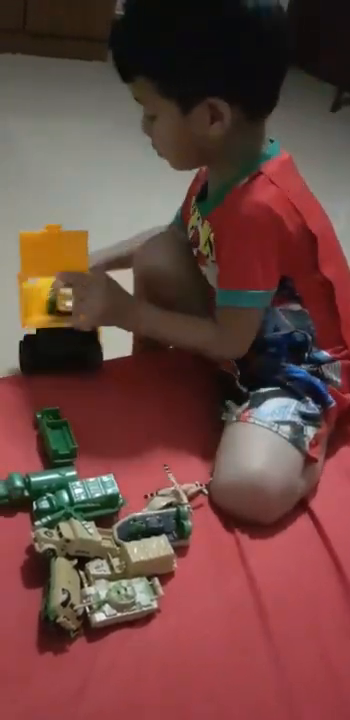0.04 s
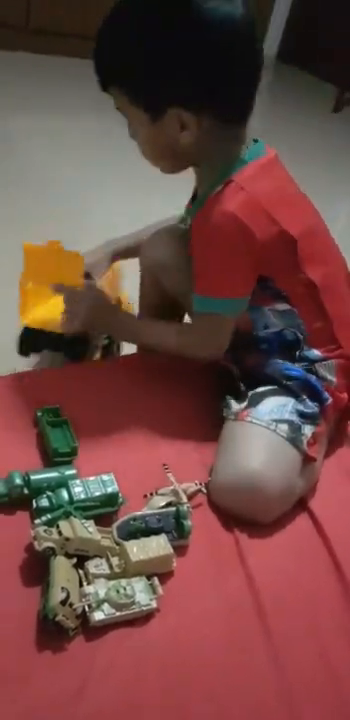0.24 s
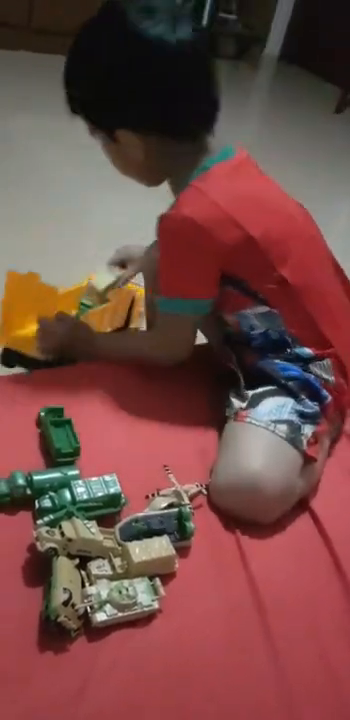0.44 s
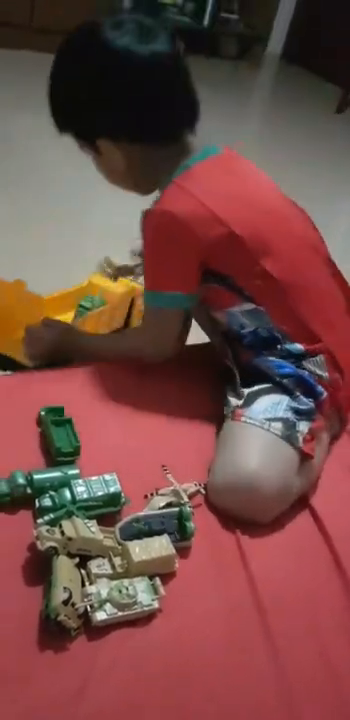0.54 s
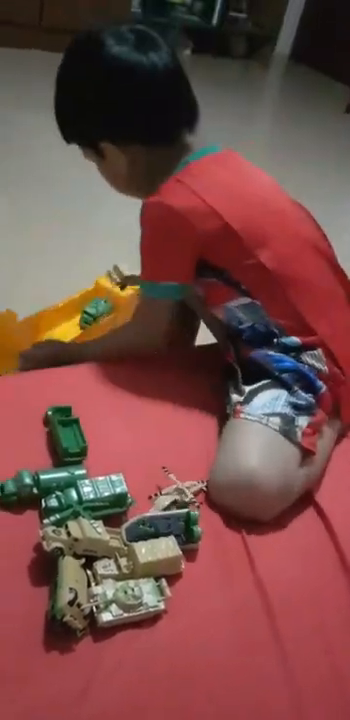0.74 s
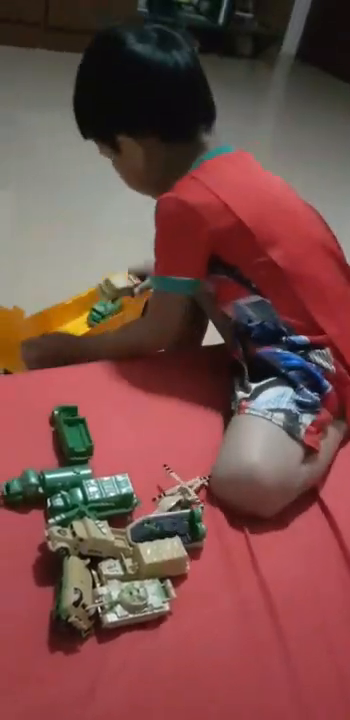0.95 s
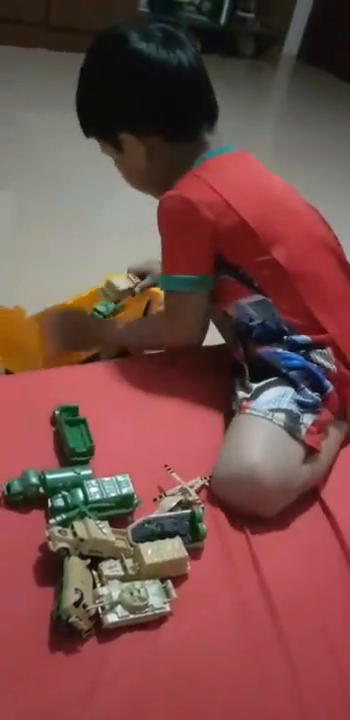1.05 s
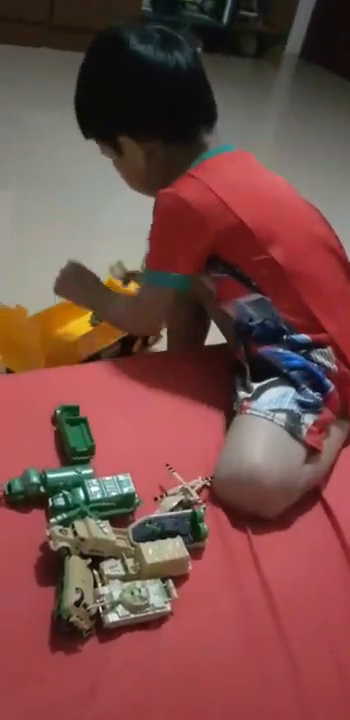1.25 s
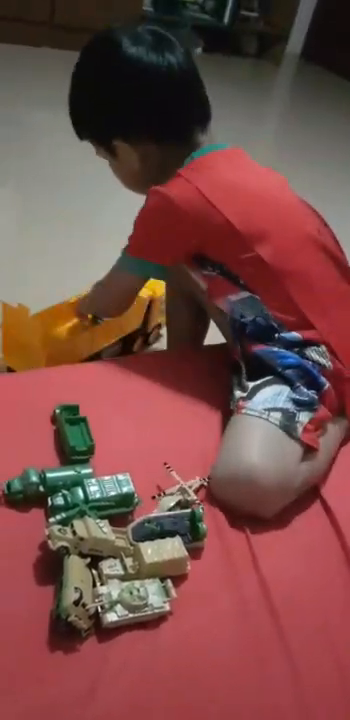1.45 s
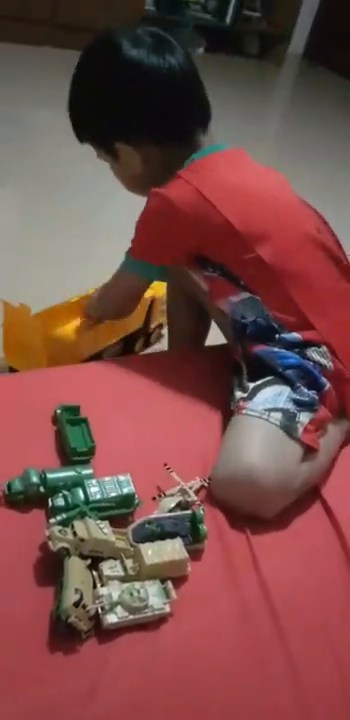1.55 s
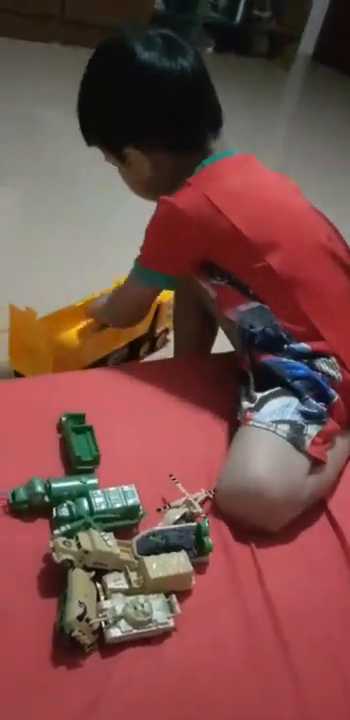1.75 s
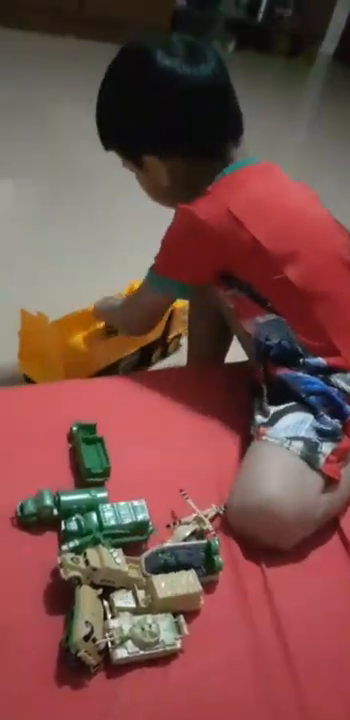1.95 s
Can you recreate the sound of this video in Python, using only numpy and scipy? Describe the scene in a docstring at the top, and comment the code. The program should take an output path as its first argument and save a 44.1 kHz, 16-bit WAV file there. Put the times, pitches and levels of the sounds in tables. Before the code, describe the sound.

A hollow plastic toy truck knocks and rattles from the start, with the loudest knock at about 0.5 seconds. Its wheels patter briefly over a hard floor, ending with lighter knocks near 0.8 seconds. After a lull, small plastic toys click together from 1.5 to 1.8 seconds. The bare room rings slightly, with a few soft low bumps on the microphone and faint rumble and hiss throughout.

```python
"""A hollow plastic toy truck is tipped over, set down and rolled a short way on a hard floor.
Its body knocks and rattles, its wheels patter; then small plastic toys click together in its bed.
Each contact spreads through the plastic as a bending wave and rings its modes in a bare, live room.
Soft low bumps reach the microphone ports, over a faint room rumble and hiss."""
import sys
import numpy as np
from scipy import signal
from scipy.fft import rfft, irfft, next_fast_len
from scipy.io import wavfile

SR = 44100
rng = np.random.default_rng(int(sys.argv[2]) if len(sys.argv) > 2 else 0)


def generate_wav(sig):
    """Save sig (samples, or channels by samples) to the path in sys.argv[1] as 16-bit PCM at SR."""
    pcm = np.round(np.clip(np.atleast_2d(sig).T, -1, 1) * 32767).astype(np.int16)
    wavfile.write(sys.argv[1], SR, pcm)


N = 88200
ROOM_BUILD_S = 0.0052


def amp(db):
    """Decibels to gain."""
    return 10 ** (np.asarray(db) / 20)


def unit(x):
    """Scale to rms 1."""
    return x / np.sqrt(np.mean(x ** 2) + 1e-20)


def decay(t, t60):
    """An envelope that falls 60 dB in t60 seconds."""
    return np.exp(-np.log(1000) * t / t60)


def along(points, hz):
    """Read a curve of (f/Hz, value) points on a log frequency axis."""
    f, v = np.transpose(points)
    return np.interp(np.log(hz + 1), np.log(f + 1), v)


def filtered(x, response):
    """Filter x by a function of frequency."""
    n = x.shape[-1]
    m = next_fast_len(n + SR // 4)
    return irfft(rfft(x, m) * response(np.fft.rfftfreq(m, 1 / SR)), m)[..., :n]


def equalised(x, curve):
    """Shape x with an EQ curve of (f/Hz, gain/dB) points."""
    return filtered(x, lambda hz: amp(along(curve, hz)))


def panned(x, balance):
    """Tilt each frequency between the left and right port."""
    return filtered(x, lambda hz: amp(along(balance, hz) * np.array([[.5], [-.5]])))


def minimum_phase(gain):
    """The impulse response with the sharpest attack for this spectrum."""
    cepstrum = irfft(np.log(np.maximum(gain, 1e-6)))
    half = len(cepstrum) // 2
    cepstrum[1:half] *= 2
    cepstrum[half + 1:] = 0
    return irfft(np.exp(rfft(cepstrum)))[:half]


def add(out, start_s, x):
    """Mix x into out at start_s."""
    i = max(round(start_s * SR), 0)
    out[:, i:i + x.shape[1]] += x[:, :N - i]


def diffuse(n):
    """Stereo noise as a room delivers it: alike in the bass, unrelated in the treble."""
    # likeness of left and right: f/Hz, correlation
    likeness = [(100, 0.7), (300, 0.7), (550, 0.62), (1000, 0.024), (3000, -0.0079)]

    def mid_side_gains(hz):
        angle = np.arccos(np.clip(along(likeness, hz), -1, 1)) / 2
        return np.array([np.cos(angle), np.sin(angle)])

    mid, side = filtered(rng.standard_normal((2, n)), mid_side_gains)
    return np.array([mid + side, mid - side])


def room_tone():
    """A faint, steady bed of rumble and hiss."""
    # colour of the bed: f/Hz, gain/dB
    colour = [(24, -31), (45, -3), (70, -6), (90, 3), (120, -15.5), (170, -7.5), (280, -7), (450, -12),
              (650, -16.5), (900, -13), (1200, -24), (2500, -33.5), (4800, -37.5), (5250, -31.5),
              (5700, -37.5), (8300, -50), (12200, -33.5), (16000, -34.5)]
    # its stereo tilt: f/Hz, left minus right/dB
    balance = [(60, -1.5), (180, -8), (550, -3.5), (1650, -3.5), (4970, 3), (15000, -2)]
    return panned(amp(-62.5) * unit(equalised(diffuse(N), colour)), balance)


def room_tail():
    """A fresh reverb tail of energy 1 a side: reflections build quickly, the treble dies first."""
    # reverb time of the bare room: f/Hz, t60/s
    reverb_times = [(150, 0.6), (500, 0.46), (1400, 0.45), (3700, 0.4), (7000, 0.43), (11000, 0.32),
                    (16000, 0.29)]
    predelay_s = 0.00067
    hz, t, bands = signal.stft(diffuse(SR * 3 // 4), SR, nperseg=256)
    tail = signal.istft(bands * decay(t, along(reverb_times, hz)[:, None]), SR, nperseg=256)[1]
    age = np.maximum(np.arange(tail.shape[1]) / SR - predelay_s, 0)
    tail *= 1 - np.exp(-age / ROOM_BUILD_S)
    return tail / np.sqrt(np.sum(tail ** 2) / 2)


def port_bumps():
    """Soft thuds of a few slow cycles, each mostly in one microphone port."""
    # low thuds: t/s, level/dB, f/Hz, left minus right/dB
    bumps = [(0.194, -44, 75, -9), (0.534, -37, 52, 21), (0.656, -57, 59, 18), (0.813, -40.5, 60, 36),
             (0.854, -38.5, 51, 31), (1.826, -42, 50, 17)]
    length_s = 0.053
    out = np.zeros((2, N))
    t = np.arange(SR // 4) / SR
    swell = np.sin(np.pi * np.minimum(t / length_s, 1)) ** 2
    for start_s, db, hz, pan_db in bumps:
        pan = amp([[min(pan_db, 0)], [min(-pan_db, 0)]])
        add(out, start_s, amp(db) * swell * np.sin(2 * np.pi * hz * t) * pan)
    return out


def wheels():
    """Hard wheels patter over the floor while the truck is pushed, with a low rumble on the left."""
    # colour of the patter: f/Hz, gain/dB
    colour = [(60, -14), (150, 2.5), (300, -2), (500, 4.5), (1000, 8), (1550, 6.5), (2200, -8), (3000, -24),
              (6000, -45), (9000, -48)]
    start_s, attack_s, stop_s, release_s = 0.524, 0.15, 0.88, 0.052
    ticks_per_s, rumble_hz, half_width_hz = 350, 72.5, 21
    t = np.arange(N) / SR
    push = np.clip((t - start_s) / attack_s, 0, 1) * np.clip((stop_s - t) / release_s + 1, 0, 1)
    ticks = (rng.random(N) < ticks_per_s / SR) * rng.standard_normal(N)
    patter = push * unit(equalised(ticks, colour))
    reverb = signal.fftconvolve(room_tail(), patter[None], axes=1)[:, :N]
    low_band = lambda hz: 1 / (1 + ((hz - rumble_hz) / half_width_hz) ** 2)
    rumble = push * unit(filtered(rng.standard_normal(N), low_band))
    return amp(-52) * (.4 * patter + 1.41 * reverb) + amp(-46) * rumble * np.array([[1], [0]])


def bending(hz):
    """Phase of a bending wave in the plastic: its speed grows with the root of its frequency."""
    delay_at_1khz_s = 0.001177
    return np.exp(-4j * np.pi * delay_at_1khz_s * np.sqrt(1000 * hz))


def ring_out(modes, shell):
    """A body's modes linger as fading tones, struck a little differently each time."""
    scatter_db, stereo_spread_rad = 3.5, 0.98
    t = np.arange(SR // 2) / SR
    tones = np.zeros((2, len(t)))
    for hz, _, db in modes:
        gain = amp(db + along(shell, hz) + rng.normal(0, scatter_db))
        phase = 2 * np.pi * (hz * t + rng.random())
        tones += gain * np.sin(phase + stereo_spread_rad * rng.standard_normal((2, 1)))
    envelope = decay(t, t60=0.36) * (1 - np.exp(-t / ROOM_BUILD_S))
    return unit(tones * envelope) / np.sqrt(len(t))


def plastic_hits(hits, shell, modes, chatter_t60_s, chatter_db, ring_db):
    """Each contact and its buzz of loose parts ring a plastic body, heard direct and through the room."""
    # hands and the truck's walls shade the direct path: f/Hz, gain/dB
    shade = [(500, -4), (1100, 3.5), (2200, 0), (4000, -2), (11000, -0.5)]
    hz = np.fft.rfftfreq(SR // 2, 1 / SR)
    resonances = sum(amp(db) ** 2 / (1 + (2 * (hz - f) / width) ** 2) for f, width, db in modes)
    body = unit(amp(along(shell, hz)) * np.sqrt(1 + resonances))
    n = SR // 20
    chatter_fade = decay(np.arange(n) / SR, chatter_t60_s)
    out = np.zeros((2, N))
    for start_s, db, bass_db, edge_db, treble_db, direct_db in hits:
        colour = [(500, bass_db), (950, 0.028), (1700, 0.023), (3500, edge_db), (11000, treble_db)]
        knock = filtered(minimum_phase(body * amp(along(colour, hz))), bending)
        contact = amp(chatter_db) * unit(diffuse(n) * chatter_fade) / np.sqrt(n)
        contact[:, 0] += 1  # the impact itself, ahead of its chatter
        paths = room_tail()
        paths[:, :n] += amp(direct_db) * equalised(unit(contact), shade) / np.sqrt(n)
        add(out, start_s, amp(db) * signal.fftconvolve(paths, knock[None], axes=1))
        add(out, start_s, amp(db + ring_db) * equalised(ring_out(modes, shell), colour))
    return out


def nudges():
    """Plastic bumps softly against plastic, with a dull, buzzy chatter."""
    # soft contacts: t/s, level/dB, bass/dB, edge/dB, treble/dB, direct over room/dB
    hits = [(0.187, -8.5, 6.5, -4.5, -5, -5.5), (0.304, -20, 15, 12, 6, -8), (0.328, -9, 5.5, 10.5, 2, -12),
            (0.462, -20.5, 15.5, 15, 11, -8), (0.801, -15, -9, -2, -5, -2.5),
            (0.806, -12.5, 6, 3, -8, -3.5), (0.823, -12.5, -3, 3, 6, -5.5), (0.908, -41.5, 10, -8, -3.5, 1),
            (1.503, -19.5, -10.5, -8, -18, -4), (1.775, -23, -1.5, 1.5, 6, -10),
            (1.811, -32.5, -3, 8, 2, 0)]
    # broad tone of the nudged plastic: f/Hz, gain/dB
    shell = [(60, -27.5), (300, -16.5), (550, 2.5), (900, -1), (1400, -1.5), (2200, -4), (3100, -21),
             (5000, -18.5), (8200, -36.5), (10500, -29.5), (16000, -44.5)]
    # its resonances: f/Hz, width/Hz, level over shell/dB
    modes = [(1199, 140, 4), (1369, 94, 9), (1800, 80, 0), (2310, 90, -2.5)]
    return plastic_hits(hits, shell, modes, chatter_t60_s=0.023, chatter_db=7.5, ring_db=-8.5)


def toy_clicks():
    """Small toys strike one another in the truck's bed: tight clicks with a higher ring."""
    # clicks: t/s, level/dB, bass/dB, edge/dB, treble/dB, direct over room/dB
    hits = [(1.5298, -10.5, -1, 3, -3, -6), (1.6225, -8, -5.5, 0, -1, -1.5), (1.718, -22, 9, 1, -14, -2.5)]
    # broad tone of the toys: f/Hz, gain/dB
    shell = [(60, -26), (300, -23), (500, 1.5), (700, -0.5), (1000, -1), (1400, -7), (2200, -6.5),
             (3000, -12.5), (4800, -12.5), (7000, -16.5), (8200, -25.5), (10500, -16.5), (12500, -18.5),
             (16000, -34.5)]
    # their resonances: f/Hz, width/Hz, level over shell/dB
    modes = [(800, 16, 3), (956, 49, 11.5), (1316, 71, 11), (1490, 63, 6), (1830, 110, 9), (2020, 110, 5),
             (2306, 57, 3.5), (4120, 34, 0), (4450, 72, -10), (4950, 38, 0)]
    return plastic_hits(hits, shell, modes, chatter_t60_s=0.014, chatter_db=4, ring_db=-6.5)


def truck_knocks():
    """The hollow truck knocks on the hard floor and its loose parts rattle."""
    # knocks: t/s, level/dB, bass/dB, edge/dB, treble/dB, direct over room/dB
    hits = [(0.0, -11.5, -2, 5.5, 1.5, -8.5), (0.201, -6, 3, -4, -6, -7.5),
            (0.216, -10, -2.5, -5.5, -3, -14), (0.26, -14.5, -12, -3, -3.5, -11.5),
            (0.343, -8, 5, -7, -6.5, -7.5), (0.359, -6, -16, 0.5, 3, -4.5),
            (0.372, -7, -3, -8.5, -10, -11.5), (0.4, -15.5, -12, -10, -1, -6),
            (0.4803, 4.5, -1.5, 0, 4.5, -3.5), (0.4915, -5.5, 8.5, -3, 2.5, -3.5),
            (0.518, -11.5, 1.5, 2, 0, -8), (0.818, -15, -9, -2.5, -9, -5), (0.842, -19.5, 1, 0, -1.5, -23),
            (0.878, -30.5, -3.5, -22, -2, 0)]
    # broad tone of the hollow body: f/Hz, gain/dB
    shell = [(60, -23), (160, -13.5), (330, -14), (440, -1.5), (650, -0.5), (1000, 0), (1600, 0.5),
             (2300, -6), (3100, -9), (5000, -12), (7000, -17.5), (8200, -28), (10500, -21), (12500, -23.5),
             (16000, -39)]
    # its resonances: f/Hz, width/Hz, level over shell/dB
    modes = [(290.4, 37, 7.5), (390, 12, -2.5), (492.5, 32, 10), (546, 9.9, 5), (646, 18, 4.5),
             (797, 40, 4.5), (911, 26, 2.5), (969, 13, 1), (1280, 110, 2), (1578, 24, -3), (1660, 19, 5.5),
             (2170, 180, 1.5), (2500, 50, 4.5), (2980, 42, 1.5), (4095, 170, 1.5)]
    return plastic_hits(hits, shell, modes, chatter_t60_s=0.025, chatter_db=3.5, ring_db=-7)


def scene():
    """Truck and toys, their lows and top treble leaning right, over the bumps and room tone."""
    # stereo tilt between the ports: f/Hz, left minus right/dB
    balance = [(100, -7), (500, -1), (1200, -2.5), (2500, -1), (4500, 1), (7000, -0.5), (9500, -6.5),
               (12000, -9), (16000, -11)]
    plastic = truck_knocks() + nudges() + toy_clicks() + wheels()
    return panned(plastic, balance) + port_bumps() + room_tone()


def record(dry):
    """A brick-wall high cut at 16 kHz."""
    return filtered(dry, lambda hz: hz < 16000)


dry = scene()
out = record(dry)
generate_wav(out)
```